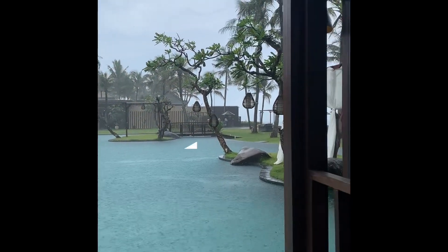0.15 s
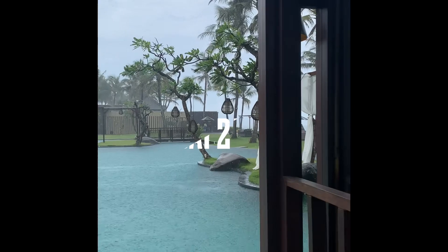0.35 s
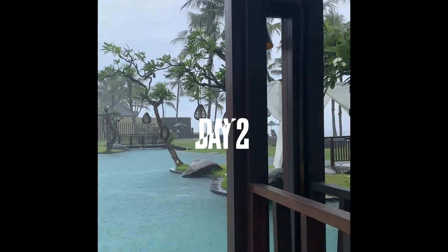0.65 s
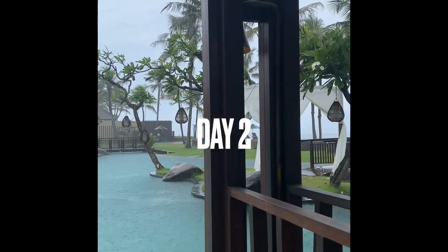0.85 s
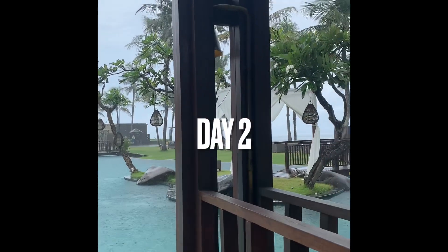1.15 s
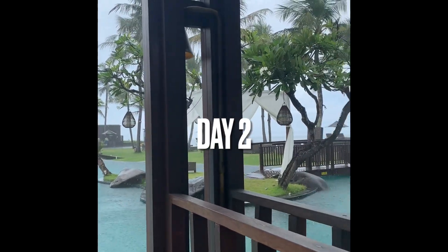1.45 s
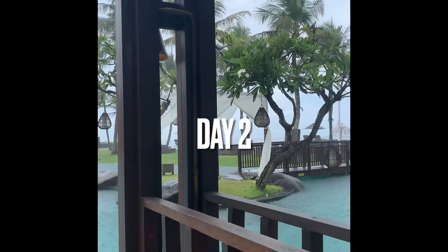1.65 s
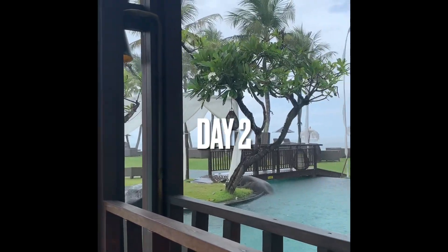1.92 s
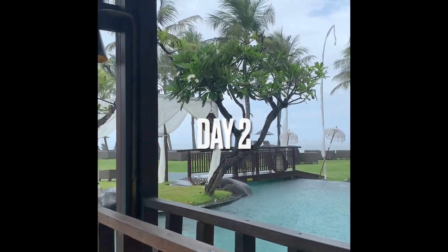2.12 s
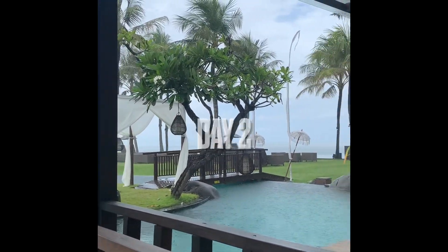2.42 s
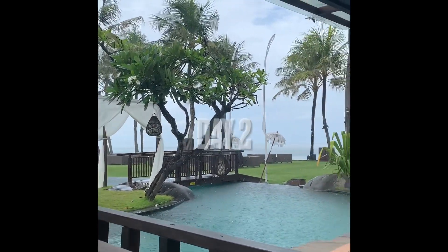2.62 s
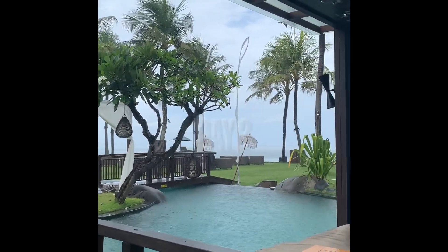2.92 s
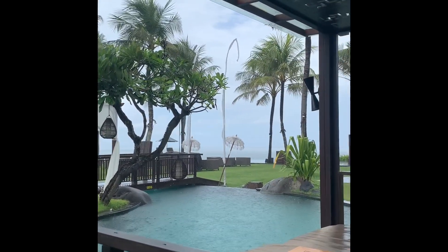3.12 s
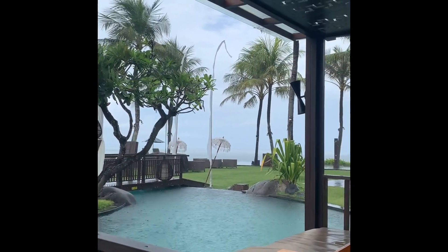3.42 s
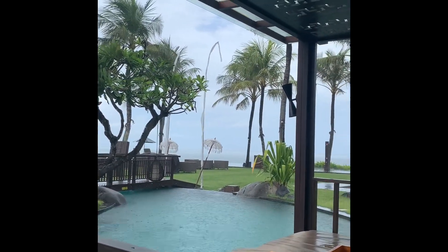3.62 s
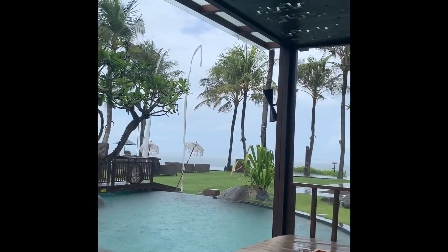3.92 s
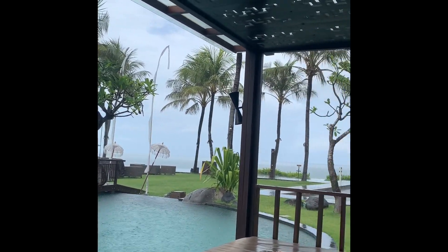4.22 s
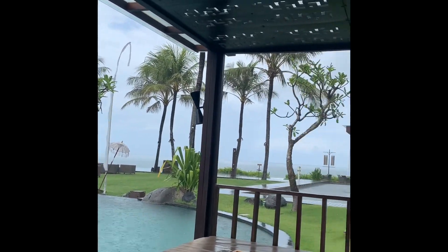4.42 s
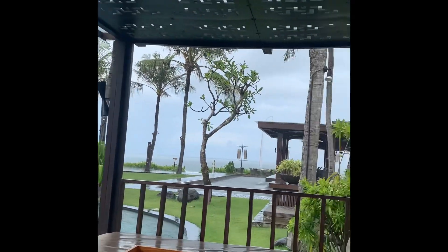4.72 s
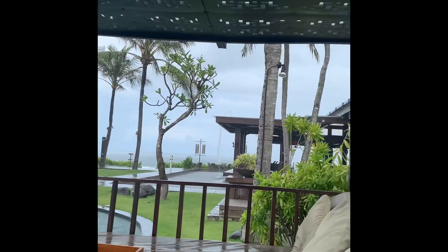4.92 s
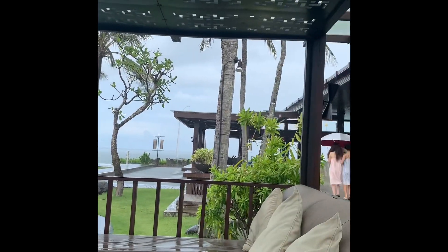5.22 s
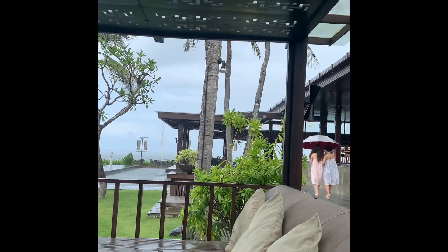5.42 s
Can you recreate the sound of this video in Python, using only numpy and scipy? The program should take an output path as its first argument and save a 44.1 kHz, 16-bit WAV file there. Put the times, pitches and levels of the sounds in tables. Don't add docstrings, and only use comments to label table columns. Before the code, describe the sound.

Heavy steady rain hisses on a pool and drums on a terrace roof, with close drop splats, dull taps and low wind buffeting.

```python
import sys
import numpy as np
from scipy import signal
from scipy.fft import rfft, irfft, next_fast_len
from scipy.io import wavfile
from scipy.ndimage import uniform_filter1d

SR = 44100
rng = np.random.default_rng(int(sys.argv[2]) if len(sys.argv) > 2 else 0)


def wrap_up_sound(samples):
    columns = np.atleast_2d(samples).T
    tamed = np.clip(columns, -1, 1)
    steps = np.round(tamed * 32767).astype(np.int16)
    wavfile.write(sys.argv[1], SR, steps)


def undo_db(level):
    steps = np.asarray(level, float) / 20
    return 10 ** steps


N = 244755
TIME = np.arange(N) / SR
SIZE = next_fast_len(N)
HZ = np.arange(SIZE // 2 + 1) * SR / SIZE

# (frequency [Hz], likeness [0-1], lead of the left [radians], left minus right [dB])
PORTS = [(100, .85, 0, -.4), (500, .9, -.35, -.6), (900, .68, -.55, -1.1), (1400, .58, -.15, -.7),
         (1950, .7, 0, -1.4), (2850, .22, 1.9, -3.2), (3350, .66, 3.1, -1), (4150, .32, 2.6, -.1),
         (5000, .34, 1.8, -.1), (6200, .86, 3.1, .1), (7300, .68, 3.9, .6), (9400, .72, 6, .1),
         (11300, .75, 6.5, .1), (14700, .75, 9.3, 0)]
LIKENESS = np.clip(np.interp(HZ, *np.transpose(PORTS)[:2]), 0, 1)


def level(x, db):
    return x * undo_db(db) / np.sqrt(np.mean(x ** 2))


def curves(table):
    s, *columns = np.transpose(table)
    return [np.interp(TIME, s, c) for c in columns]


def shape(points):
    hz, db = np.transpose(points)
    return undo_db(np.interp(np.log(HZ + 1), np.log(hz), db))


def bell(hz, octaves):
    return np.exp(-.5 * (np.log2((HZ + 1) / hz) / octaves) ** 2)


def walk(rate):
    hold = int(SR / rate)
    steps = np.repeat(rng.standard_normal(N // hold + 1), hold)
    smooth = uniform_filter1d(uniform_filter1d(steps, hold), hold)[:N]
    smooth = smooth - uniform_filter1d(smooth, size=5 * hold)
    return smooth / smooth.std()


def drops(rate, spread_db, smear_s):
    biggest = 5.6
    size_db = spread_db * np.minimum(rng.exponential(size=N), biggest)
    hits = (rng.random(N) < rate / SR) * undo_db(size_db)
    spray = signal.lfilter([1], [1, -np.exp(-1 / (smear_s * SR))], hits ** 2)
    return rfft(level(np.sqrt(spray + 1e-18) * rng.standard_normal(N), 0), SIZE)


def ports(common, apart, likeness):
    hz, _, lead, balance_db = np.transpose(PORTS)
    half = np.array([[.5], [-.5]])
    lag = np.exp(1j * half * np.interp(HZ, hz, lead))
    shared = np.sqrt(likeness) * common * lag
    own = np.sqrt(1 - likeness) * apart
    return (shared + own) * undo_db(half * np.interp(HZ, hz, balance_db))


def bird():
    # (time [s], pitch [Hz], level [dB])
    song = [
        (2.57, 945, -70),
        (2.59, 940, -50),
        (2.64, 925, -50),
        (2.69, 910, -57),
        (2.73, 900, -72),
    ]
    hz, db = curves(song)
    tone = np.sin(2 * np.pi * np.cumsum(hz) / SR)
    sounding = (TIME > song[0][0]) * (TIME < song[-1][0])
    note = undo_db(db + 1.8 * walk(39.8)) * tone * sounding
    return np.array([undo_db(-3) * np.roll(note, 12), undo_db(2) * note])


def wind(flutter_db=1.03):
    # (time [s], level [dB])
    gusts = [(0.0, -41), (0.2, -45), (0.5, -46.5), (0.9, -46.5), (1.2, -48.5), (1.33, -44), (1.45, -48),
             (2.2, -50), (2.33, -42), (2.47, -59), (2.55, -47), (3.45, -47), (3.68, -49), (3.95, -45.5),
             (4.1, -48.5), (4.6, -45.5), (4.67, -51), (4.75, -43.5)]
    # (frequency [Hz], level [dB per Hz])
    wind_tone = [(15, -46), (25, -16), (68, -3.5), (97, 0), (184, -5.5), (250, -12), (298, -9), (420, -23),
                 (550, -25), (920, -120)]
    # (time [s], level of the difference [dB])
    swirls = [(0.02, -46), (0.3, -54), (0.66, -49), (1.21, -52), (1.65, -50), (1.85, -52), (2.09, -54),
              (2.53, -51), (2.84, -56), (3.63, -47), (3.78, -52), (3.98, -53), (4.27, -50), (4.7, -59),
              (4.95, -54), (5.42, -51)]
    tone = shape(wind_tone) * bell(90, 1.41)
    both, cross = (level(irfft(tone * rfft(rng.standard_normal(N), SIZE), SIZE)[:N]
                         * undo_db(flutter_db * walk(16)), 0) for _ in range(2))
    flow = undo_db(curves(gusts)[0] + 1.5 * walk(12))
    calm_db, swirl_s = -59, .09
    swirl = undo_db(calm_db) + sum(undo_db(db) * np.exp(-((TIME - s) / swirl_s) ** 2) for s, db in swirls)
    unrest = undo_db(0.5 * walk(10))
    return both * flow + cross * swirl * unrest * np.array([[1], [-1]])


def thumps(fall=0.26):
    # (time [s], peak level [dB], pitch [Hz], left minus right [dB], length [cycles])
    eddies = [(0.055, -33, 81, -0.7, 0.6), (0.065, -19.5, 163, 4, 0.53), (0.076, -21.5, 116, -6, 0.99),
              (0.231, -29, 106, -3, 1.5), (0.352, -31.5, 91.5, 2, 1.7), (0.378, -28.5, 103, -6, 0.77),
              (0.581, -34, 190, -0.7, 1.6), (0.599, -30, 84, 0, 2.0), (0.647, -33, 97, 14, 0.8),
              (0.912, -35, 184, 0, 1.7), (0.965, -34, 127, -4, 1.2), (2.255, -43, 111, -3, 0.9),
              (3.572, -17.5, 111, 3.5, 1.2), (3.826, -34, 120, -1.6, 1.2), (4.299, -30, 97, 0.7, 0.54),
              (4.599, -34.5, 102, -0.8, 2.0), (4.751, -29, 112, -0.4, 1.3), (4.791, -35, 126, 0, 2.1),
              (4.871, -35, 130, -1.4, 0.63), (5.114, -32.5, 109, -1, 1.7), (5.148, -31.5, 95.5, 3, 1.2),
              (5.262, -33, 110, -2, 1.6), (5.322, -30, 118, -4, 1.2), (5.357, -27, 156, 2, 1.6)]
    out = np.zeros((2, N))
    for s, db, hz, pan_db, cycles in eddies:
        near = slice(max(int((s - .06) * SR), 0), int((s + .06) * SR))
        turns = (TIME[near] - s) * hz
        push = np.exp(-2.8 * (turns / max(cycles, .6)) ** 2)
        swing = np.cos(2 * np.pi * turns * (1 - fall * turns) + 1.62)
        sides_db = np.array([[pan_db], [-pan_db]]) / 2
        out[:, near] += undo_db(db - 3.0 + sides_db) * push * swing
    return out


def knocks(hz=420, fade=0.0016):
    # (time [s], level [dB])
    drips = [(0.036, -48), (0.07, -45), (0.363, -47), (0.702, -47.4), (1.133, -46), (1.169, -44),
             (1.368, -43), (1.632, -40.5), (1.712, -44), (1.808, -44), (1.896, -44), (2.133, -48),
             (2.272, -46), (2.413, -45), (2.495, -48), (2.727, -48), (2.801, -45), (2.95, -49),
             (3.562, -45), (3.628, -46), (3.66, -47), (3.914, -47), (4.117, -48.7), (4.567, -48),
             (4.701, -49), (5.007, -48.5), (5.45, -49)]
    out = np.zeros(N)
    age = TIME[:2000]
    swell = (1 - np.exp(-age / .0003)) * np.exp(-age / fade)
    for (s, db), (pitch, sign) in zip(drips, rng.standard_normal((len(drips), 2))):
        tap = np.sin(2 * np.pi * hz * undo_db(1.5 * pitch) * age) * swell
        start = int((s - .0015) * SR)
        out[start:start + len(tap)] += np.sign(sign) * undo_db(db + 7) * tap
    return out * np.array([[1.1], [-.9]])


def plops():
    # (time [s], peak level [dB], pitch [Hz], ring [s])
    bubbles = [
        (1.4903, -35, 2940, 0.014),
        (2.7994, -44, 1450, 0.014),
        (5.11, -45, 2580, 0.014),
    ]
    out = np.zeros(N)
    for s, db, hz, ring in bubbles:
        age = np.clip(TIME - s, 0, 1)
        tone = np.sin(2 * np.pi * hz * age * (1 + 0.36 * age))
        out += undo_db(db + 0.5) * tone * np.exp(-np.log(10) * age / ring)
    return irfft(ports(rfft(out, SIZE), 0, 1.0), SIZE)[:, :N]


def splashes(wide_octaves=0.48, fade_s=0.011):
    # (time [s], peak level [dB])
    fine_drops = [(0.3192, -29.5), (0.3834, -37), (0.4324, -30), (0.4454, -33), (0.4913, -33.5),
                  (0.7497, -33), (1.4244, -36), (1.6904, -36), (2.6984, -45), (2.7594, -35), (2.831, -39),
                  (3.2014, -36), (3.231, -32), (3.5004, -39), (4.1744, -41), (4.3914, -47), (4.4333, -36),
                  (4.4934, -38), (4.5164, -35), (4.6054, -35), (5.0214, -34), (5.1302, -30), (5.1532, -42),
                  (5.3144, -37.5), (5.3664, -40), (5.4224, -35)]
    # (time [s], peak level [dB])
    fat_drops = [
        (0.2814, -38),
        (0.832, -27),
        (1.1164, -36),
        (1.2274, -35),
        (2.4114, -29),
        (3.4054, -31),
        (5.1537, -27),
        (5.5424, -38),
    ]
    bursts = [(*d, 10400) for d in fine_drops] + [(*d, 5000) for d in fat_drops]
    out = 0
    spray = rng.standard_normal(N)
    for hz in (5000, 7100, 9900, 14000):
        env = np.zeros(N)
        for s, db, centre_hz in bursts:
            start = int(s * SR)
            age = TIME[start:] - s
            near = np.exp(-.5 * (np.log2(centre_hz / hz) / wide_octaves) ** 2)
            env[start:] += near * undo_db(db - 6.5) * np.exp(-np.log(10) * age / fade_s)
        out = out + rfft(env * spray, SIZE) * bell(hz, 0.35)
    return irfft(ports(out, 0, 0.77), SIZE)[:, :N]


def rain(split_hz=3200, patchy_db=0.27, flicker_db=0.65, turn=0.97):
    # (time [s], strength [dB], share of the roar from straight ahead [0-1])
    downpour = [
        (0.0, -44, 0.33),
        (0.03, -48, 0.12),
        (0.89, -48, 0.25),
        (2.5, -49, 0.24),
        (3.15, -48.5, 0.28),
        (4.45, -47.5, 0.54),
        (5.22, -46.5, 0.5),
        (5.55, -45.5, 0.64),
    ]
    # (frequency [Hz], level [dB per Hz])
    rain_tone = [(150, -6), (300, -6.5), (500, -10.5), (1000, -10.5), (2000, -10.5), (2800, -14),
                 (4000, -15.5), (5500, -17), (8000, -19.5), (9100, -22.5), (10200, -19), (12000, -20.5),
                 (14000, -24)]
    roar_db, ahead = curves(downpour)
    swing_db = roar_db - roar_db.mean()
    low = 1 / (1 + (HZ / split_hz) ** 4)
    colour = shape(rain_tone) / np.sqrt(1 + (140 / (HZ + 1)) ** 4)

    common, *apart = (drops(8200, 2.73, 0.0016) for _ in range(3))
    narrow, wide = (irfft(colour * np.sqrt(low) * ports(common, np.array(apart), LIKENESS ** p), SIZE)[:, :N]
                    for p in (1 - turn, 1 + turn))
    ahead = np.clip(ahead, 0, 1)
    far = ahead * narrow + (1 - ahead) * wide

    octaves = np.array([bell(hz, .4) for hz in 250 * 2 ** np.arange(5)])
    spectrum = rfft(far, SIZE) / (octaves.sum(axis=0) + 1e-9)
    roar = 0
    for k, octave in enumerate(octaves):
        follows = 1 if k else 0.17
        patch_db = max(1.6 - .45 * k, .5)
        gain = undo_db(follows * swing_db + patch_db * walk(6))
        roar = roar + gain * irfft(spectrum * octave, SIZE)[:, :N]

    common, *apart = (drops(3000, 2.6, 0.0041) for _ in range(3))
    high = colour * np.sqrt(1 - low) * ports(common, np.array(apart), LIKENESS)
    bands = np.array([bell(hz, 0.096) for hz in 2000 * 2 ** np.arange(0, 3.1, .33)])
    bands = bands / (bands.sum(axis=0) + 1e-9)
    sheet = patchy_db * walk(9.9)
    hiss = sum(undo_db(sheet + flicker_db * walk(14)) * irfft(high * b, SIZE)[:, :N] for b in bands)
    return level(roar + hiss * undo_db(0.43 * swing_db + 1.02), -43.5)


def scene():
    return rain() + splashes() + plops() + knocks() + wind() + thumps() + bird()


def roll_off(x):
    return signal.sosfilt(signal.butter(12, 15810, fs=SR, output="sos"), x)


def record(dry):
    dry = signal.sosfilt(signal.butter(2, 45, "high", fs=SR, output="sos"), dry)
    total, difference = rfft([dry[0] + dry[1], dry[0] - dry[1]], SIZE) / 2
    mono_from_hz, mono_to_hz = 9050, 11700
    sheen = undo_db(np.interp(HZ, [13500, 15500], [0, 1.5]))
    sided = (HZ < mono_from_hz) | (HZ > mono_to_hz)
    difference = irfft(difference * sheen * sided, SIZE)[:N]
    low, middle, high = 5750, 6250, 6900
    fades_hz, ends_hz = 13850, 14500
    steady = (HZ <= fades_hz) * ((HZ <= low) | (HZ > high))
    kept = irfft(total * steady, SIZE)[:N]
    treble = irfft(total * (HZ > mono_from_hz), SIZE)[:N]
    treble = np.log(uniform_filter1d(treble ** 2, size=4096))
    treble = (treble - treble.mean()) / treble.std()
    for lo, hi, bar in ((low, middle, -1.0), (middle, high, -.5), (fades_hz, ends_hz, 0.)):
        is_open = walk(30) + .6 * treble > bar
        kept = kept + is_open * irfft(total * (HZ > lo) * (HZ <= hi), SIZE)[:N]
    return roll_off(np.array([kept + difference, kept - difference]))


dry = scene()
out = record(dry)
wrap_up_sound(out)
```